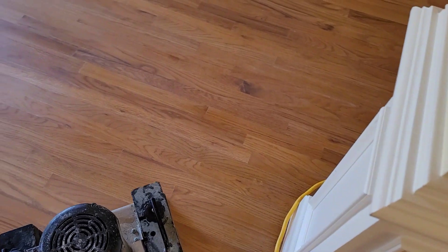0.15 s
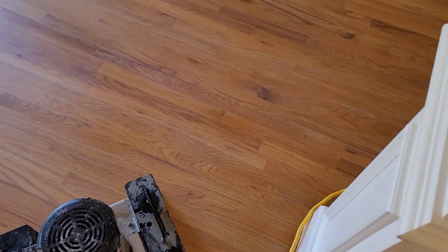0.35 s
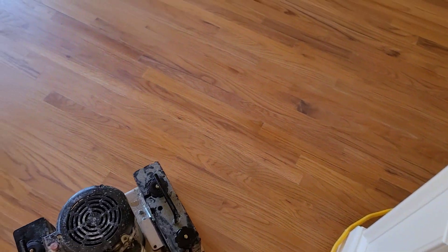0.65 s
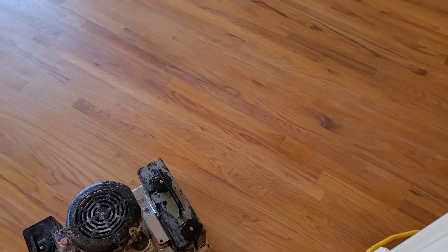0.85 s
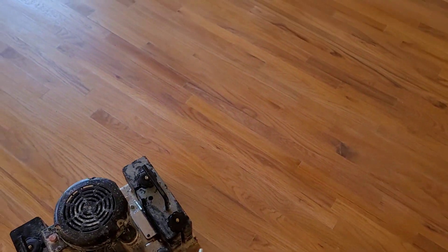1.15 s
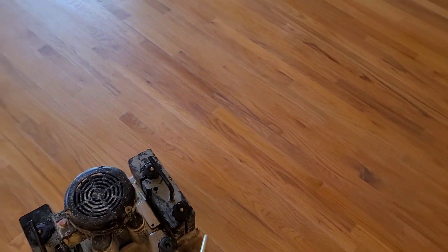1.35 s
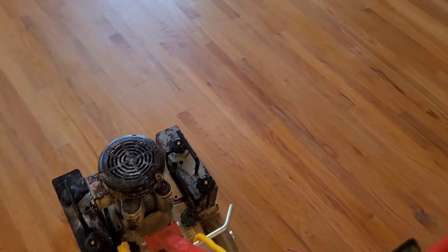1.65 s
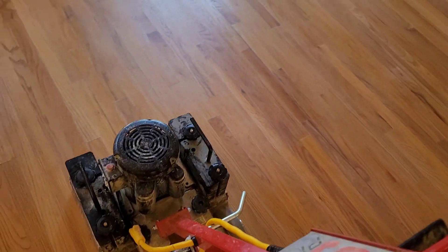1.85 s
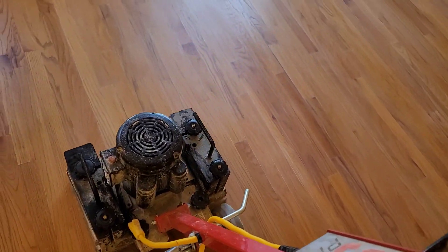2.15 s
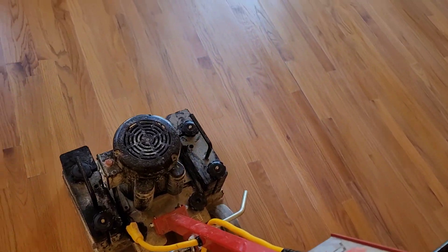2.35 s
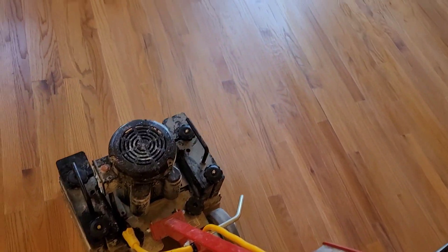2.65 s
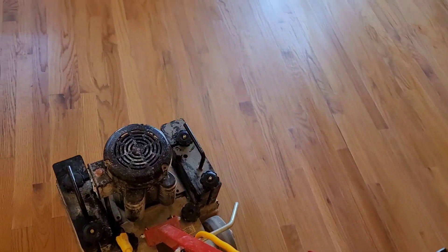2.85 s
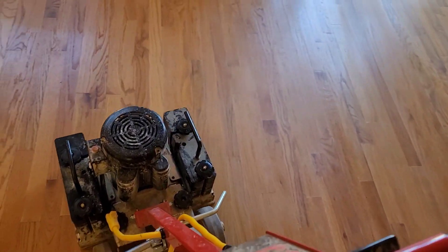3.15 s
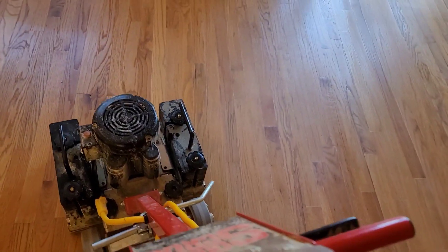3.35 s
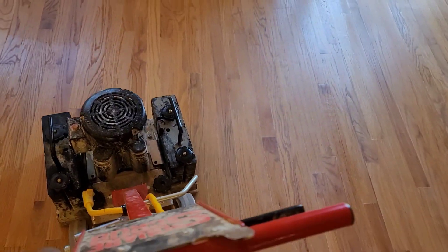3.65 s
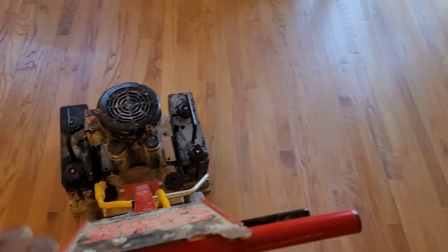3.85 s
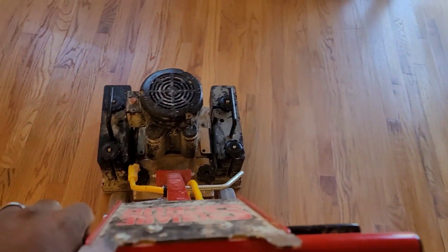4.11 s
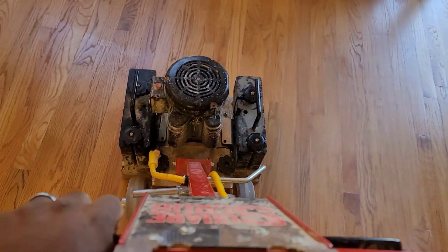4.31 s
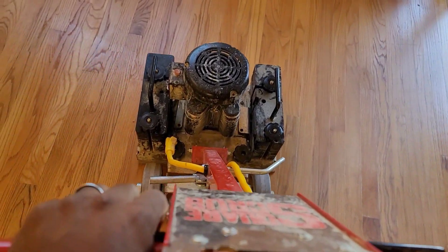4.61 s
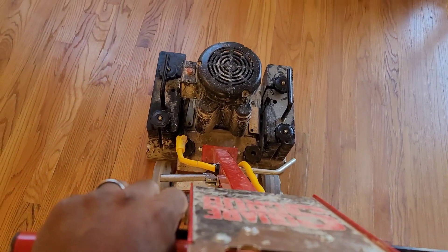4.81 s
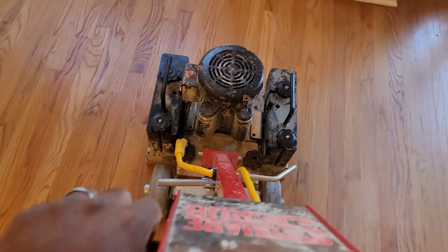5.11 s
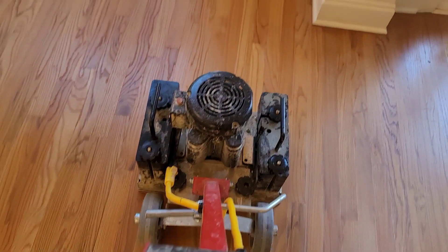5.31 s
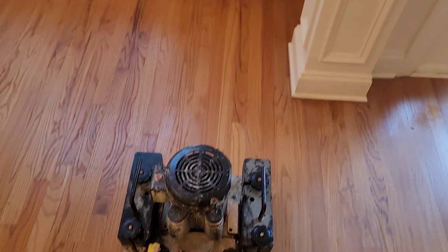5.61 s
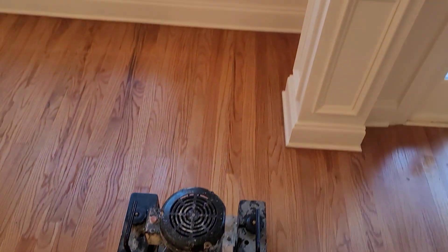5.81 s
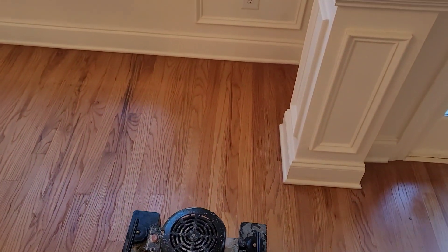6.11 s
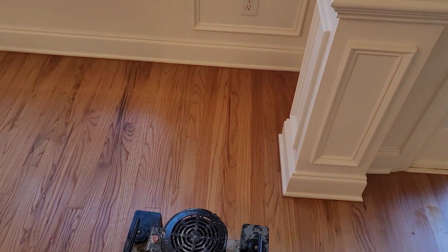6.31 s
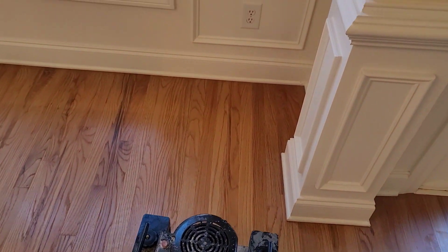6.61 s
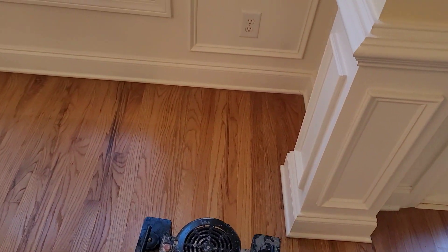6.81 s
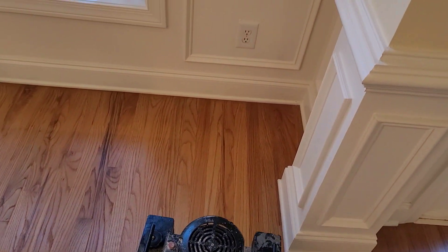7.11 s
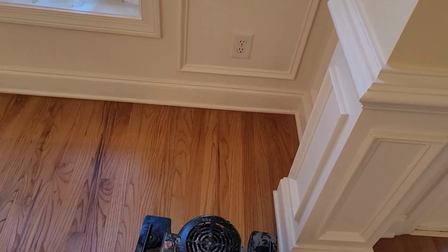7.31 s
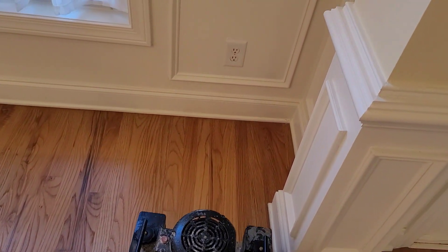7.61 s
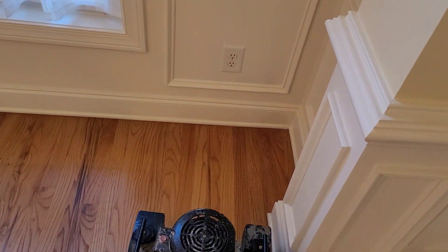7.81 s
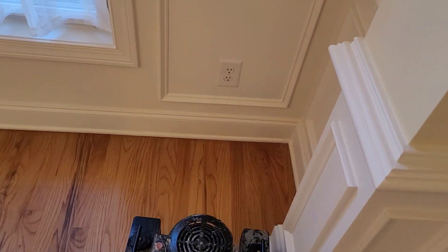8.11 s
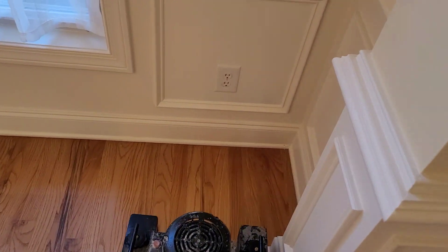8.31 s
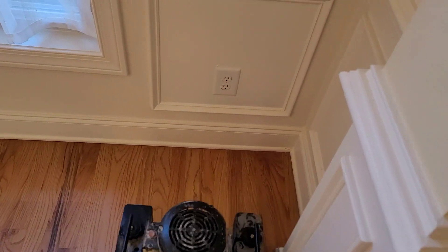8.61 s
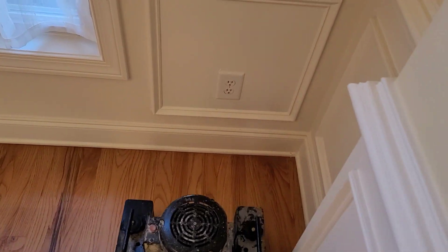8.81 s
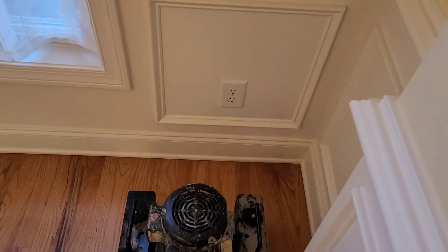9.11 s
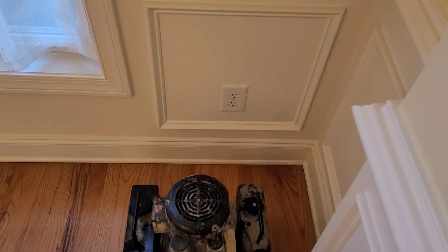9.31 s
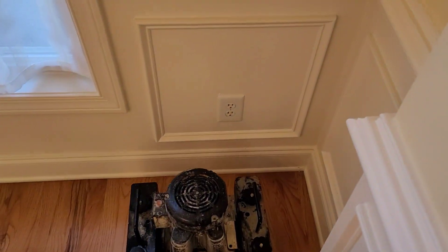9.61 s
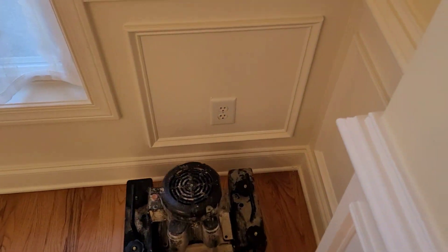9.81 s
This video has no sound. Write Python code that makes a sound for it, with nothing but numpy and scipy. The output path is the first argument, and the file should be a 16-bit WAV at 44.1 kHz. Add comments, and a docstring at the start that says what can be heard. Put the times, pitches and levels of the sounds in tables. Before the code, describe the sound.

A continuous electric drone, already running at the start, is heard in stereo from the operator's position indoors. Over it lies grainy pad friction, mid-heavy, with wavering plate resonance and thin bearing whine. Tones drift in loudness while pitch stays nearly fixed. Fine crackle is constant but faint; after about eight seconds larger dry ticks cluster as the machine nears the wall. It never stops.

```python
"""On a wooden floor in a bare room, an orbital floor machine is pushed towards a wall, heard at its handle.
The eccentric drive hums as harmonics of its speed, which swell and fade through the room's standing waves;
bearing tones lie between them. The pad rubs the boards as filtered noise and rings its plate's resonances.
Grit crackles under it as short noise bursts, densest on one side of each orbit."""
import sys
import numpy as np
from scipy import signal
from scipy.fft import rfft, irfft, next_fast_len
from scipy.io import wavfile
from scipy.ndimage import map_coordinates

SR = 44100
rng = np.random.default_rng(int(sys.argv[2]) if len(sys.argv) > 2 else 0)


def waveform_to_disk(signal):
    """Save audio, clipped to [-1, 1], as 16-bit WAV at the path in sys.argv[1]."""
    frames = np.transpose(np.atleast_2d(signal))
    scaled = np.clip(frames, -1, 1) * 32767
    samples = np.round(scaled).astype(np.int16)
    wavfile.write(sys.argv[1], SR, samples)


N = 438794
TIME = np.arange(N) / SR
EDGE_HZ = 15800  # upper band edge


def gain_of(db):
    """Decibel law: level to amplitude ratio."""
    return 10 ** (np.asarray(db) / 20)


def evened(x):
    """Power normalization: scales to an rms of one."""
    return x / np.sqrt(np.mean(x ** 2) + 1e-20)


def curves(rows):
    """Linear interpolation: each column of a table of times, sample by sample."""
    s, *columns = np.transpose(rows)
    return [np.interp(TIME, s, column) for column in columns]


def swing(rows):
    """Relative level: a curve in dB above or below its mean."""
    db = curves(rows)[0]
    return db - db.mean()


def read(points, hz):
    """Spectral interpolation on a log-frequency axis."""
    f, value = np.transpose(points)
    return np.interp(np.log(hz + 1), np.log(f + 1), value)


def drift(rate_hz):
    """Low-passed random fluctuation of rms one, with little motion above the rate."""
    size = 4096
    hz = np.fft.rfftfreq(size, TIME[-1] / size)
    lowpass = (hz > 0) / (1 + (hz / rate_hz) ** 4)
    slow = irfft(rfft(rng.standard_normal(size)) * lowpass)
    return np.interp(np.arange(N), np.linspace(0, N, size), evened(slow))


def shaped(x, gain):
    """Linear filtering: multiplies the spectrum by a gain that is a function of frequency."""
    size = next_fast_len(N)
    spectrum = rfft(x, size) * gain(np.fft.rfftfreq(size, 1 / SR))
    return irfft(spectrum, size)[..., :N]


def resonate(x, hz, pole_width_hz):
    """Two-pole resonance by heterodyning: shifts the curve hz to zero, low-passes and shifts back."""
    turn = np.exp(2j * np.pi * np.cumsum(hz) / SR)
    r = np.exp(-np.pi * pole_width_hz / SR)
    # two equal poles give steep skirts
    lowered = signal.lfilter([(1 - r) ** 2], [1, -2 * r, r * r], x * turn.conj())
    return (turn * lowered).real


# balance of the two microphones: (frequency [Hz], left minus right [dB])
MIC_BALANCE = [(60, -.9), (300, .6), (800, -.2), (1300, -2.4), (1850, -3.2), (2700, -1.1), (3900, -2.7),
               (5000, 1.6), (6500, 7.6), (7900, 11.5), (10000, 6), (14000, .3)]


def ports(hz):
    """Level difference: gains of the left and right microphone, at constant total power."""
    lean = gain_of(read(MIC_BALANCE, np.atleast_1d(hz)))
    return np.array([lean, np.ones_like(lean)]) * np.sqrt(2 / (1 + lean ** 2))


# correlation between the two microphones: (frequency [Hz], coefficient [-1 to 1])
MIC_LIKENESS = [(120, .96), (290, .9), (370, .65), (470, .05), (1200, -.12), (3300, -.16), (5000, -.03)]


def likeness(hz):
    """Spatial correlation: long waves reach both microphones almost in step."""
    return np.clip(read(MIC_LIKENESS, hz), -1, 1)


# speed of the drive, which picks up a little as the pad gets going: (time [s], speed [orbits/s])
DRIVE_SPEED = [(0, 58.55), (3, 58.86), (9.95, 58.8)]
ORBIT_HZ = np.mean(DRIVE_SPEED, axis=0)[1]


def drive_angle():
    """Rotation: the shaft's angle [rad] is the integral of its slightly unsteady speed."""
    speed = curves(DRIVE_SPEED)[0] + .04 * drift(5)
    return 2 * np.pi * np.cumsum(speed) / SR


# nodes (-) and loud spots (+) of the standing waves, keyed by multiple of the speed:
# (time when passed [s], gain [dB], half length [s])
STANDING_SPOTS = {2: [(0, -7, 0.62), (4.4, -14, 0.74), (7.2, 5.5, 1.4), (9.7, -3, 0.74)], 3: [(.3, -15, .3),
                  (2.0, 7, 0.52), (5.9, -12, 0.27), (7.0, 7.5, 0.71)], 3.61: [(2.8, -14, .4)],
                  5: [(.4, -6.5, 0.58), (3.6, -11.5, 0.46), (5.8, -6, 0.83), (8.2, 2, 0.31)],
                  5.39: [(5.1, 8, .6), (7.2, -13, 1.4)], 6: [(1.9, -21, 0.48), (8.4, -8, 1.8)],
                  9: [(1.1, 12, 0.78), (3.7, 10.5, 0.66), (9.4, 12, 0.85)], 10: [(4.8, 4, 1)],
                  11: [(.6, -4, 0.23), (1.6, 7.5, 0.33), (2.3, -4.5, 0.23), (7.22, 9, 0.35), (8.6, -1, .3),
                  (9.7, 7.5, .4)]}


def standing(multiple):
    """Standing waves: a tone's gain dips smoothly through each node and swells through each loud spot."""
    spots = STANDING_SPOTS.get(multiple, [])
    return gain_of(sum(db * np.exp(-((TIME - s) / half_s) ** 2) for s, db, half_s in spots))


# fundamental on the way through the room, before its trim: (time [s], level [dB])
FUNDAMENTAL = [(0.12, -27.5), (1.3, -23), (1.87, -17.5), (2.54, -18.5), (2.73, -16.5), (4.32, -13.5),
               (6.73, -15.5), (8.21, -11.5), (9.29, -11.5), (9.8, -13.5)]
# overtones that carry the hum, away from nodes and loud spots and before ripple:
# (multiple of the speed, level [dB])
HUM_ORDERS = {2: -29.5, 3: -38, 5: -32.5, 6: -39.5, 9: -48, 11: -39.5}


def hum(angle, trim_db=0.05, ripple_db=0.2677, ripple_hz=1.27, slide_rad=0.73, slide_hz=0.2):
    """Unbalance excitation: the eccentric weight shoves machine and floor once an orbit.

    The shorter an overtone's wave, the more its level ripples on the way."""
    def tone(order, shift):
        hz = order * ORBIT_HZ
        lag = np.arccos(likeness(hz))  # the right microphone lags
        left = order * angle + shift
        return np.sqrt(2) * ports(hz) * np.cos([left, left - lag])

    out = gain_of(curves(FUNDAMENTAL)[0] + trim_db) * tone(1, 0)
    for order, db in HUM_ORDERS.items():
        level = gain_of(db + ripple_db * order * drift(ripple_hz))
        out += level * standing(order) * tone(order, slide_rad * drift(slide_hz))
    return out


# weaker whole orders, before standing-wave gain: (multiple of the speed, level [dB])
FAINT_ORDERS = {4: -43, 7: -50, 8: -49.5, 10: -48.5, 13: -48, 16: -62, 18: -54, 22: -50, 33: -50}
# bearing tones between the orders, before standing-wave gain: (multiple of the speed, level [dB])
BEARING_TONES = {3.61: -41, 5.39: -44, 5.6: -47.5, 6.2: -50, 7.22: -51, 9.11: -50, 9.2: -49.5, 9.39: -45,
                 9.78: -49, 15.19: -55, 16.19: -52}


def whine(angle, lines, fade=.5, fade_hz=0.71):
    """Multipath interference: faint tones arrive directly and by echoes that shift as the machine travels."""
    out = np.zeros((2, N))
    for multiple, db in lines.items():
        hz = multiple * ORBIT_HZ
        same = likeness(hz)
        left, other = (drift(fade_hz) + 1j * drift(fade_hz) for _ in range(2))
        right = same * left + np.sqrt(1 - same ** 2) * other
        echoes = np.array([left, right])
        direct = np.exp(-1j * np.array([[0], [np.arccos(same)]]))
        carrier = np.exp(1j * (multiple * angle + 2 * np.pi * rng.random()))
        tone = ((direct + fade * echoes) * carrier).real
        out += gain_of(db) * standing(multiple) * ports(hz) * evened(tone)
    return out


# colour of the rubbing noise, before band trims and overall level: (frequency [Hz], gain [dB])
RUBBING_COLOUR = [(30, -12), (78, -2.5), (105, -10.5), (200, -6.5), (350, -4), (480, -5), (1000, -5),
                  (1350, 0.34), (1850, -3.5), (2380, -8), (3800, -8), (6150, -15.5), (7850, -30.5),
                  (8600, -24.5), (9700, -27), (11500, -24), (15300, -27)]
# how hard the pad bites; only the swing about the mean is used: (time [s], level [dB])
PAD_BITE = [(0.3, -31.5), (1.65, -31), (7.91, -29), (8.25, -27.5), (9.6, -28)]
# middle band of the rubbing; its swing about the mean is scaled: (time [s], level [dB])
RASP_LEVEL = [(0.5, -32), (0.87, -31.5), (1.51, -31.5), (3.8, -32.5), (5.46, -31), (9.4, -29)]


def rub(angle, level_db=-12, rumble_db=0.36, rasp_db=1.34, hiss_db=1.4, fizz_db=-0.5,
        throb=0.12, flicker_db=1.03, boom_db=1.74):
    """Sliding friction: countless fibres slip on the boards, as noise.

    A harder bite lifts the treble most, and the finest hiss throbs with each orbit."""
    a, b = rng.standard_normal((2, N))
    right = shaped(a, likeness) + shaped(b, lambda hz: np.sqrt(1 - likeness(hz) ** 2))
    slips = np.array([a, right])
    bite_db = swing(PAD_BITE)

    def band(lo, hi):
        def colour(hz):
            inside = (hz >= lo) * (hz < hi)
            return inside * ports(hz) * gain_of(read(RUBBING_COLOUR, hz))
        return shaped(slips, colour)

    stroke = throb * (np.cos(angle) + .5 * np.cos(2 * angle))
    # rumble, rasp, hiss and fizz
    out = band(38, 600) * gain_of(rumble_db + boom_db * drift(5.8))
    out += band(600, 2400) * gain_of(rasp_db + 0.83 * swing(RASP_LEVEL))
    out += band(2400, 7900) * gain_of(hiss_db + 0.85 * bite_db)
    out += band(7900, EDGE_HZ) * (1 + stroke) * gain_of(fizz_db + bite_db + flicker_db * drift(22))
    return gain_of(level_db) * out


# resonances of the pad plate and housing, level before the bite's swing:
# (frequency [Hz], width of each of two poles [Hz], level [dB], rms sweep [share of the frequency])
PLATE_MODES = [(1367, 340, -35.5, 0.024), (1556, 117, -32, 0.024), (2110, 150, -35.5, 0.02),
               (2700, 190, -41, 0.01), (3253, 440, -42, 0.0085), (4804, 160, -46, .005),
               (5750, 180, -47, 0.006)]


def plate():
    """Modal resonance: friction rings the plate, wavering in pitch and strength as the pad grips and lets go."""
    sweep_hz, swell_hz, swell_db = 9, 6, 1.3
    grip = drift(sweep_hz)  # shared by all modes
    out = np.zeros((2, N))
    for hz, pole_width_hz, db, sweep in PLATE_MODES:
        ring = resonate(rng.standard_normal((2, N)), hz * (1 + sweep * grip), pole_width_hz)
        out += gain_of(db) * ports(hz) * evened(ring * gain_of(swell_db * drift(swell_hz)))
    return out * gain_of(0.086 * swing(PAD_BITE))


def reflections(x, echo=0.19, travel_s=.0004):
    """Comb filtering: echoes from handle, boards and skirting, whose delays slide as the machine moves."""
    out = x.copy()
    for channel, sound in zip(out, x):
        for delay_s in (.0016, .0034, .0061):
            place = np.arange(N) - SR * (delay_s + travel_s * drift(0.504))
            channel += echo * map_coordinates(sound, [place], order=1)
    return out / np.sqrt(1 + 3 * echo ** 2)


def room(x, t60=.35, wet_db=-3):
    """Reverberation: bare walls and boards add a dense, short decaying tail to each microphone."""
    t = np.arange(SR // 2) / SR
    tail = rng.standard_normal((2, len(t))) * gain_of(-60 * t / t60)
    tail /= np.linalg.norm(tail, axis=1, keepdims=True)
    return x + gain_of(wet_db) * signal.fftconvolve(x, tail, axes=1)[:, :N]


# larger grains of grit, before the coarse trim and reverberation: (time [s], level at onset [dB])
LARGE_GRAINS = [(3.2063, -28), (7.9146, -30), (8.172, -20), (8.3012, -32), (8.7517, -21), (8.9213, -19),
                (9.0734, -30), (9.1393, -28), (9.1722, -22), (9.2086, -30), (9.3772, -23), (9.4142, -30)]


def grit(angle, fine_db=-64.0, coarse_trim_db=-6):
    """Impulsive excitation: dust is crushed mostly on one side of the orbit, in three pitches of snap."""
    grains_per_s = 130  # at each pitch, before the orbit and the bite vary it
    decay_s, size_db, pole_width_hz = .0012, 2.6, 2800
    chance = grains_per_s / SR * (1 + np.cos(angle)) * gain_of(4 * swing(PAD_BITE))
    crush = np.exp(-np.arange(SR // 100) / SR / decay_s)
    out = np.zeros((2, N))
    snaps = []
    for hz in (11200, 13000, 14700):
        ring = resonate(rng.standard_normal((2, N)), np.full(N, hz), pole_width_hz)
        snaps.append(evened(ring) * ports(hz))
    for snap in snaps:
        sizes = gain_of(size_db * np.minimum(rng.exponential(1, N), 3))
        grains = sizes * (rng.random(N) < chance)
        out += gain_of(fine_db) * evened(signal.oaconvolve(grains, crush)[:N]) * snap
    for s, db in LARGE_GRAINS:
        span = round(s * SR) + np.arange(len(crush))
        burst = evened(sum(snap[:, span] for snap in snaps))
        out[:, span] += gain_of(db + coarse_trim_db) * crush * burst
    return room(out, t60=.3, wet_db=-2)


def scene():
    """Superposition: one shaft drives the hum, the bearing and the pad."""
    angle = drive_angle()
    tones = whine(angle, FAINT_ORDERS, fade=.8) + whine(angle, BEARING_TONES, fade=.4)
    return hum(angle) + tones + reflections(rub(angle) + plate()) + grit(angle)


def record(dry):
    """Band limiting: a steep linear-phase low-pass at the upper band edge."""
    lowpass = signal.firwin(1023, EDGE_HZ, window=("kaiser", 9), fs=SR)
    return signal.oaconvolve(dry, lowpass[None], "same", axes=1)


dry = scene()
out = record(dry)
waveform_to_disk(out)
```